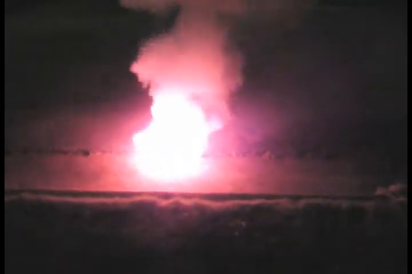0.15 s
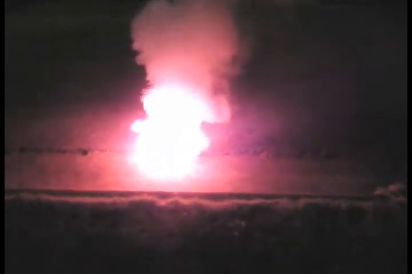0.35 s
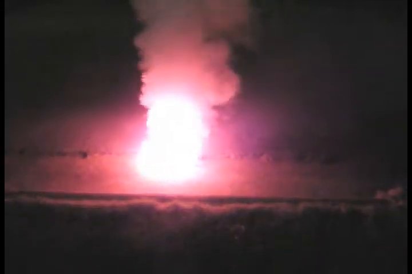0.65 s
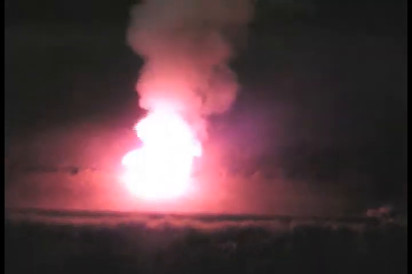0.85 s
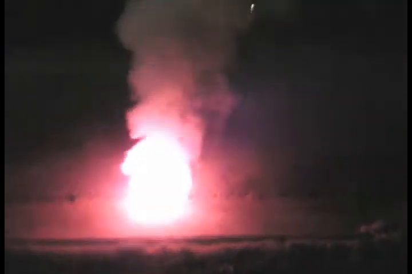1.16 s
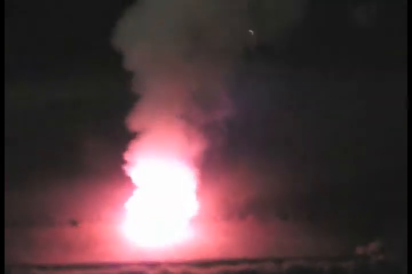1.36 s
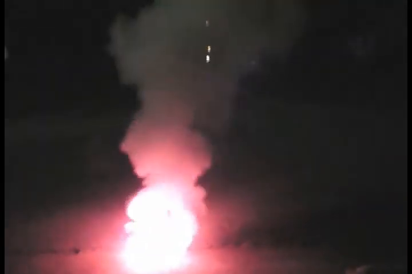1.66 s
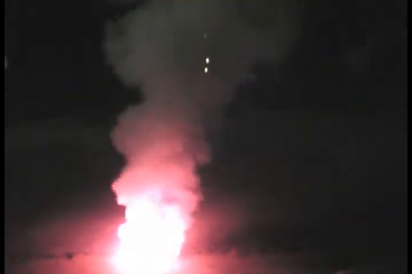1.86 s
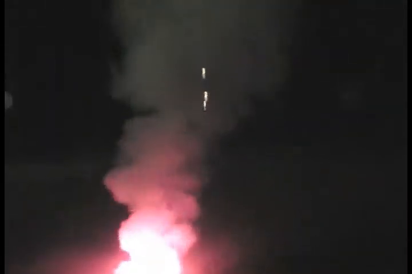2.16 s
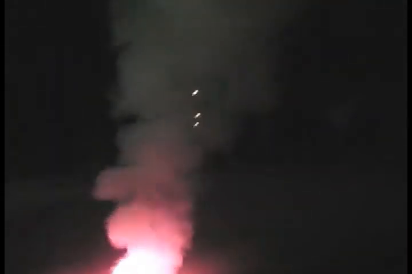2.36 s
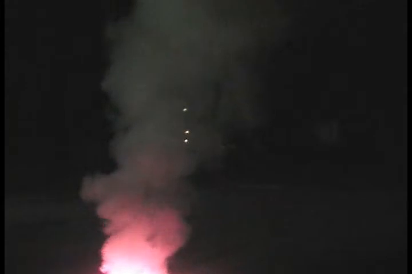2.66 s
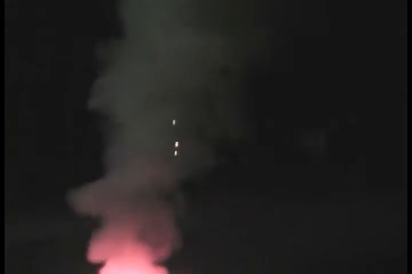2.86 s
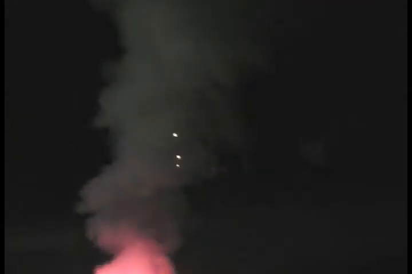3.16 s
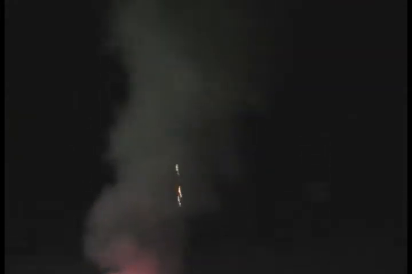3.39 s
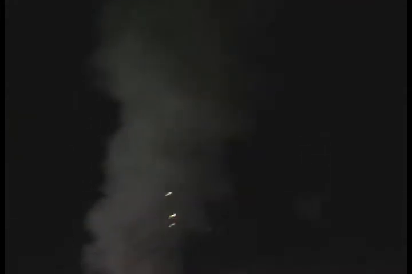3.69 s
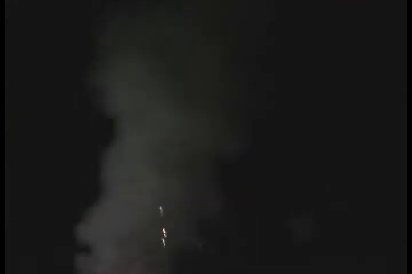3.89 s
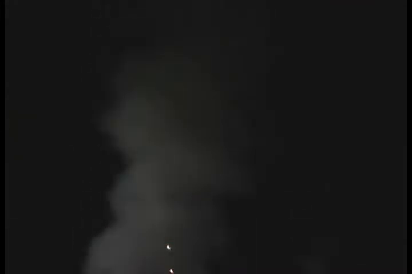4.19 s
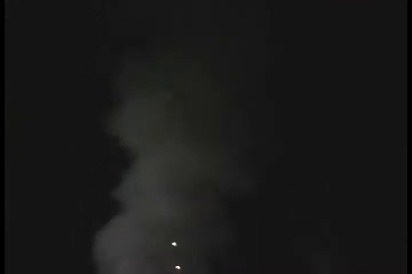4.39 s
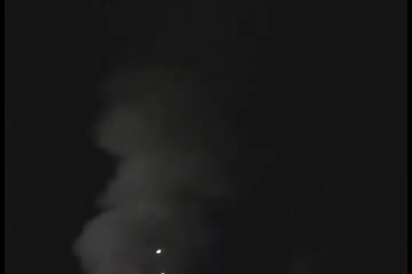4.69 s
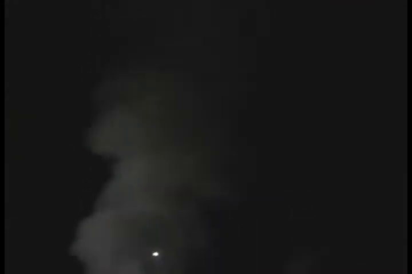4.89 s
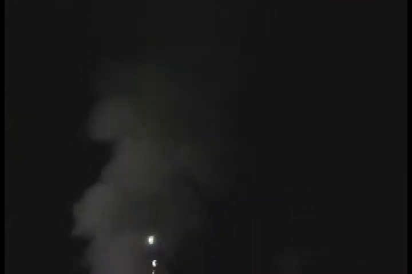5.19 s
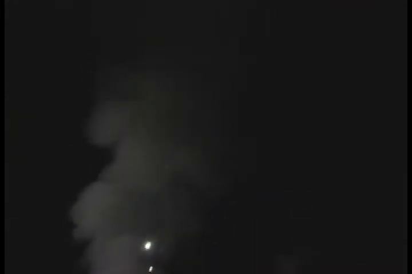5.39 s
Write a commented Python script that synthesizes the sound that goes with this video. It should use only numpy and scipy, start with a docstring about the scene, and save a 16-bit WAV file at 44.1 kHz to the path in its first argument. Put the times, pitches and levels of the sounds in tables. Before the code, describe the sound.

The turbulent roar and hiss of a burning smoke bomb starts steady and is cut early by a single loud, snapping pop that momentarily ducks the level. The rush then gradually weakens, phasing slightly as the microphone turns upward, while tiny whistles swell and vanish. Behind it is the low, far-off rumble of an open yard at night and a faint electric hum that rises a little near the end.

```python
"""A homemade smoke bomb burns on the ground at night: its turbulent gas jet roars and hisses, finely
sputtering as grains of fuel catch, steady at first, then slowly fading. A gas pocket bursts with one sharp
pop that overloads the microphone and ducks its gain control; now and then a faint whistle swells.
The microphone tilts up after the smoke, so the hiss changes colour and a nearby reflection shifts.
A far-off rumble and a faint electric hum lie underneath."""
import sys
import numpy as np
from scipy import signal
from scipy.fft import rfft, irfft
from scipy.io import wavfile
from scipy.ndimage import uniform_filter1d, minimum_filter1d

SR = 44100
rng = np.random.default_rng(int(sys.argv[2]) if len(sys.argv) > 2 else 0)


def put_to_file(sound):
    """Save the sound as 16-bit audio at rate SR, in the file named by the first command-line argument."""
    columns = np.atleast_2d(sound).T  # one column per channel
    safe = np.clip(columns, -1, 1)
    whole_steps = np.round(safe * 32767)
    wavfile.write(sys.argv[1], SR, whole_steps.astype(np.int16))


N = 244314
TIME = np.arange(N) / SR


def jet(tilt, roar_db=-26.5, hiss_db=-34, fade_from_s=1.384, fade_db_per_s=2.78):
    """Turbulence radiates broadband noise; the hiss is directional, so its colour changes off axis."""
    # The flame's roar, then the hiss head-on and off axis. Each row: frequency in Hz, relative level in dB.
    roar_spectrum = [(25, -31.5), (45, -25.5), (65, -21.5), (88, -13.5), (115, -5.5), (220, 0.5), (310, -4),
                     (420, 1), (540, -0.5), (720, -2), (1010, -6), (1170, -11.5), (1700, -29.5),
                     (3000, -47.5)]
    front_spectrum = [(700, -28), (1200, -12), (1510, 1), (1650, -4.5), (1820, -1.5), (2050, -8.5),
                      (2400, -7), (2850, -15.5), (3900, -17.5), (4500, -27.5), (5200, -38), (5700, -37),
                      (6200, -43), (7300, -64)]
    aside_spectrum = [(700, -8.5), (1200, -2), (1420, 2), (1680, -4), (1770, -2.5), (1950, -4.5),
                      (2450, -4), (3100, -11.5), (4000, -30), (5000, -29.5), (5600, -32.5), (6050, -46),
                      (6600, -43.5), (7300, -62.5)]
    flutter = drift(rate=4.4)
    gas = turbulence(grains_per_s=900, grain_db=-7.5, spread_db=7.0)
    flame = turbulence(grains_per_s=410, grain_db=-17.5, spread_db=-1.0)
    roar = coloured(flame, roar_spectrum) * from_db(roar_db + 0.52 * flutter)
    aside = 0.78 * np.tanh(5.5 * tilt)  # the off-axis share grows early in the tilt
    hiss = rms_one((1 - aside) * coloured(gas, front_spectrum) + aside * coloured(gas, aside_spectrum))
    hiss *= from_db(hiss_db + 2.17 * tilt + 0.51 * flutter)  # over the tilt it gains on the roar
    burn = from_db(-fade_db_per_s * np.maximum(TIME - fade_from_s, 0))
    return burn * (roar + hiss)


def turbulence(grains_per_s, grain_db, spread_db):
    """Gaussian gas noise plus shot noise: single grains of fuel catch at independent random moments."""
    sizes = from_db(spread_db * np.minimum(rng.exponential(1, N), 4))
    signs = rng.choice([-1, 1], N)
    catches = rng.random(N) < grains_per_s / SR
    return rng.standard_normal(N) + from_db(grain_db) * rms_one(sizes * signs * catches)


def pop(start_s=0.75766, overpressure_s=0.00016, overload_db=14.0, gain_db=9.45):
    """A bursting gas pocket sends out a blast wave, which excites damped modes and returns as echoes."""
    # What the pop sets ringing. Each row: frequency in Hz, relative level in dB, t60 in seconds.
    modes = [(860, -24.5, 0.015), (1500, -17, 0.01), (1770, -14, 0.014), (2400, -22, 0.0058)]
    # Echoes from across the yard. Each row: delay in seconds, gain in dB, low-pass cutoff in Hz.
    echoes = [(0.048, -17, 750), (0.05, -19, 750), (0.052, -22, 3000)]
    age = np.maximum(TIME - start_s, 0) / overpressure_s
    pressure = (1 - age) * np.exp(-age) * (TIME >= start_s)  # a jump, then a longer suction
    blast = np.tanh(from_db(overload_db) * pressure)  # flattened by the overdriven microphone
    kick = np.zeros(N)
    kick[round(start_s * SR)] = 1
    rings = sum(from_db(db) * ring(kick, hz, t60) for hz, db, t60 in modes)
    crack = signal.sosfilt(signal.butter(2, 230, "high", fs=SR, output="sos"), blast + rings + 1e-18)
    body = low_pass(crack, hz=2160, order=5)
    snap = signal.sosfilt(signal.butter(3, (3120, 6700), "band", fs=SR, output="sos"), crack)
    direct = from_db(gain_db) * (body + from_db(-19.5) * snap + from_db(-31.5) * crack)
    return direct + sum(from_db(db) * delayed(low_pass(direct, hz), delay) for delay, db, hz in echoes)


def whistles(waver_hz=33.9, wavers_per_s=91.5):
    """Random frequency modulation makes brief tones breathy; each swells and sinks on a Gaussian curve."""
    # Each row: centre in seconds, pitch in Hz, rms level at the crest in dB, Gaussian sigma in seconds.
    tones = [(1.165, 550, -24.5, 0.013), (2.766, 1397, -34, 0.031), (3.16, 1402, -34.5, 0.024),
             (5.09, 1001, -40, 0.032)]
    out = np.zeros(N)
    for centre_s, hz, level_db, sigma_s in tones:
        phase = 2 * np.pi * np.cumsum(hz + waver_hz * drift(wavers_per_s)) / SR
        swell = np.exp(-.5 * ((TIME - centre_s) / sigma_s) ** 2)
        out += np.sqrt(2) * from_db(level_db) * swell * np.sin(phase)
    return out


def ground_reflection(x, delay_s=0.000359, gain_db=-3.1):
    """Two-path interference: a reflection off the ground arrives just behind the direct sound."""
    return x + from_db(gain_db) * delayed(x, delay_s)


def gliding_bands(x):
    """Time-varying filtering: peaks and hollows in the spectrum glide as the microphone turns."""
    # Each row: bandwidth in Hz, then a path whose points give time in seconds, centre in Hz, gain in dB.
    bands = [ (130, [(0.3, 1443, 3.5), (1.1, 1490, 4.5), (1.5, 1560, -3), (2.0, 1450, 1), (2.6, 1480, 1.5),
             (3.6, 1550, 1.5), (4.2, 1540, -3)]), (90, [(1.0, 1646, -8), (1.5, 1830, -9.5),
             (1.9, 2000, -0.5), (2.35, 1880, -10.5), (2.8, 1910, -7), (3.3, 1980, -5), (4.5, 1915, -2)]),
             (110, [(1.5, 1668, -8), (1.85, 1620, -9.5), (2.4, 1600, 2), (3.1, 1660, -5),
             (3.6, 1610, 3.5)]), (450, [(0.6, 2830, -1), (1.1, 3360, -3), (1.5, 3190, -10),
             (2.15, 3310, -4.5), (2.45, 3300, -0.5), (4.4, 3480, 1.5)]), (170, [(1.0, 2310, 3),
             (1.35, 2400, 3), (2.2, 2330, 1.5), (2.7, 2530, 0.5), (3.4, 2450, 1.5), (4.8, 2520, 2.5)]),
             (140, [(0.8, 403, -1), (1.3, 385, -2), (2.0, 372, -2), (3.3, 354, 0), (4.6, 350, 1)]),
             (110, [(0.5, 541, 2.5), (1.25, 520, 0), (1.65, 520, 2), (2.3, 515, 0), (3.3, 510, 0),
             (4.5, 502, -1)]), (150, [(0.7, 710, -1.5), (1.5, 720, -0.5), (2.6, 740, 1.5)]),
             (80, [(0.6, 200, 1.5), (1.2, 200, -0.5), (1.65, 199, 1), (2.6, 199, -0.5), (4.2, 203, -1)]),
             (170, [(2.4, 2670, 0.5), (3.3, 2770, -0.5), (5.0, 2800, -6.5)]), (400, [(2.2, 2850, -1.5),
             (2.45, 2880, 2), (2.9, 3000, 1.5), (4.2, 3060, 1)]), (140, [(0.6, 3970, -4), (0.85, 4030, 1.5),
             (1.35, 4060, 5), (1.98, 4000, 6.5), (2.4, 4010, -1), (3.7, 3980, -0.5)]),
             (500, [(0.7, 4850, -2), (1.2, 4900, -5), (2.0, 4900, -5), (2.6, 4900, 1)])]
    for width_hz, path in bands:
        hz, gain_db = in_time(path)
        carrier = np.exp(2j * np.pi * np.cumsum(hz) / SR)
        baseband = low_pass(x / carrier, width_hz / 2, order=1)  # the band, shifted down to 0 Hz
        band = 2 * np.real(carrier * baseband)
        x = x + (from_db(gain_db) - 1) * band
    return x


def near_reflection(x):
    """Comb filtering: a reflection from close by shifts as the microphone moves, so the rush phases."""
    # Each row: time in seconds, delay of the reflection in seconds, its gain in dB.
    path = [(0.95, 0.0024, -13.5), (1.45, 0.0018, -19.5), (1.95, 0.0021, -12), (2.3, 0.0021, -16),
            (2.6, 0.0024, -20.5), (4.4, 0.0021, -23), (5.1, 0.0019, -16.5)]
    delay_s, gain_db = in_time(path)
    return x + from_db(gain_db) * delayed(x, delay_s)


def night_rumble(level_db=-42):
    """Stationary noise, strongest at low frequencies, is heard as the far-off rumble of the night."""
    # Each row: frequency in Hz, relative level in dB.
    spectrum = [(25, -11.5), (45, -19), (75, -6), (120, -6.5), (330, -1.5), (700, -6.5), (1100, -7.5),
                (2500, -21), (5000, -47.5)]
    return from_db(level_db) * coloured(rng.standard_normal(N), spectrum)


def hum(swell_db=6.5):
    """Electric hum, a superposition of faint low sines that swell together late in the burn."""
    # Each row: frequency in Hz, rms level before the swell in dB.
    partials = [(59.5, -65.5), (105.5, -57), (118.5, -61), (157.5, -61.5), (239.4, -52), (404, -59.5)]
    tones = sum(np.sqrt(2) * from_db(db) * np.sin(2 * np.pi * hz * TIME) for hz, db in partials)
    return tones * from_db(swell_db * ease(from_s=4.18, to_s=4.8))


def gain_control(x, threshold_db=0.0, release_db_per_s=12.5):
    """Look-ahead limiting: peaks over the threshold pull the gain down just ahead; it creeps back."""
    over_db = np.maximum(20 * np.log10(np.abs(x) + 1e-9) - threshold_db, 0)
    release_db = release_db_per_s * TIME
    held_db = np.maximum.accumulate(over_db + release_db, axis=-1) - release_db
    ahead = SR // 1000  # one millisecond
    gain_db = uniform_filter1d(minimum_filter1d(-held_db, ahead), ahead)
    return x * from_db(gain_db)


def self_noise(level_db=-70):
    """The noise floor: the microphone's own electronics hiss steadily."""
    # Each row: frequency in Hz, relative level in dB.
    spectrum = [(2000, -2), (4000, -1), (5100, -5.5), (5650, -2.5), (6100, -13.5), (7000, -24.5)]
    return from_db(level_db) * coloured(rng.standard_normal(N), spectrum)


def from_db(db):
    """Decibels to amplitude ratio."""
    return 10 ** (np.asarray(db) / 20)


def rms_one(x):
    """Normalisation to unit rms."""
    return x / np.sqrt(np.mean(x ** 2) + 1e-20)


def in_time(rows):
    """Linear interpolation of each column at every sample; the first column is time in seconds."""
    times, *columns = np.transpose(rows)
    return [np.interp(TIME, times, column) for column in columns]


def ease(from_s, to_s):
    """A raised-cosine move from 0 to 1."""
    return .5 - .5 * np.cos(np.pi * np.clip((TIME - from_s) / (to_s - from_s), 0, 1))


def delayed(x, delay_s):
    """Fractional delay by linear interpolation."""
    return np.interp(TIME - delay_s, TIME, x)


def low_pass(x, hz, order=2):
    """Butterworth low-pass."""
    return signal.sosfilt(signal.butter(order, min(hz, .45 * SR), fs=SR, output="sos"), x + 1e-18)


def drift(rate):
    """Low-passed noise of unit rms that changes about rate times a second."""
    hz = np.fft.rfftfreq(N, 1 / SR)
    return rms_one(irfft(rfft(rng.standard_normal(N)) / (1 + (hz / rate) ** 2), N))


def coloured(x, spectrum):
    """Spectral shaping by a curve drawn on a log-frequency axis; the result has unit rms."""
    points_hz, points_db = np.transpose(spectrum)
    hz = np.maximum(np.fft.rfftfreq(N, 1 / SR), 1)
    level_db = np.interp(np.log(hz), np.log(points_hz), points_db, left=-90, right=-110)
    return rms_one(irfft(rfft(x) * from_db(level_db), N))


def ring(x, hz, t60):
    """A damped resonator: a unit click starts a sine of height 1 that falls 60 dB in t60 seconds."""
    decay = from_db(-60 / (t60 * SR))
    step = 2 * np.pi * hz / SR
    return signal.lfilter([0, np.sin(step)], [1, -2 * decay * np.cos(step), decay * decay], x + 1e-18)


def scene():
    """Superposition of the burning charge and the quiet night, in mono."""
    tilt = ease(from_s=0.92, to_s=3.44)  # the microphone turns up after the smoke
    charge = jet(tilt) + ground_reflection(pop())
    fire = near_reflection(gliding_bands(charge)) + whistles()
    return (fire + night_rumble() + hum())[None]


def record(dry, dc_offset=-.0386, cutoff_hz=14000):
    """The signal chain: gain control, electronic hiss, a slight converter offset and a steep low-pass."""
    converted = gain_control(dry) + self_noise() + dc_offset
    return signal.sosfilt(signal.cheby2(12, 70, cutoff_hz, fs=SR, output="sos"), converted)


dry = scene()
out = record(dry)
put_to_file(out)
```